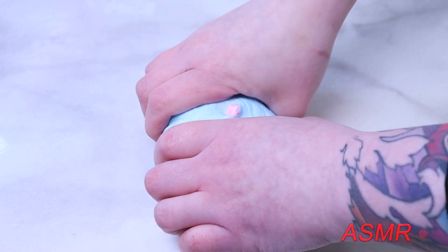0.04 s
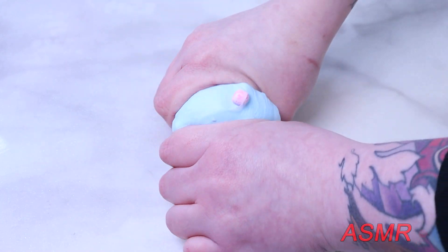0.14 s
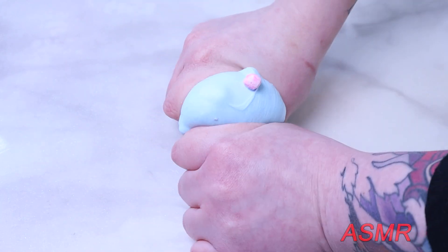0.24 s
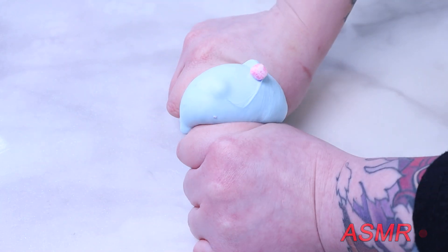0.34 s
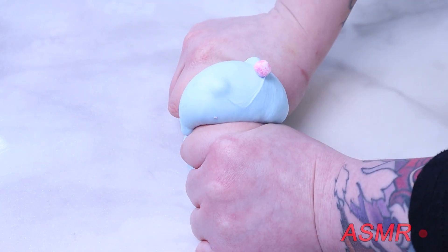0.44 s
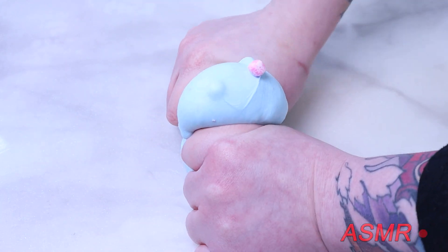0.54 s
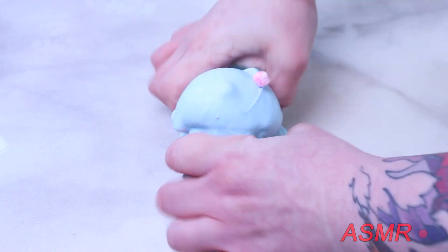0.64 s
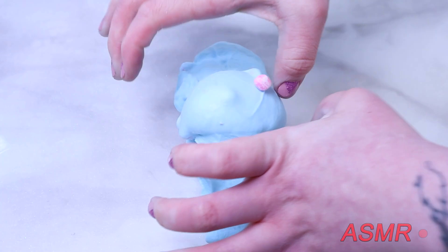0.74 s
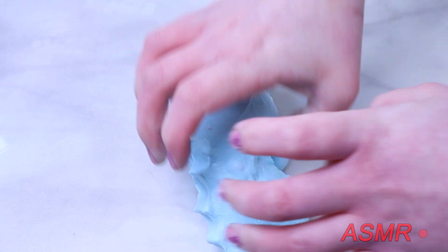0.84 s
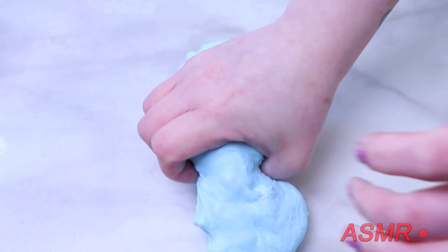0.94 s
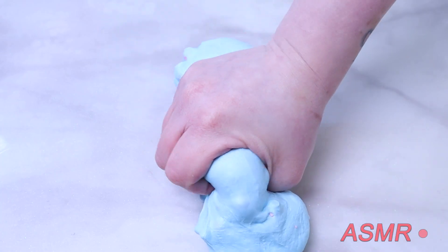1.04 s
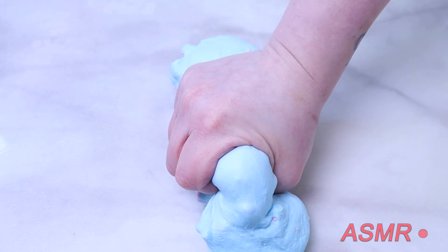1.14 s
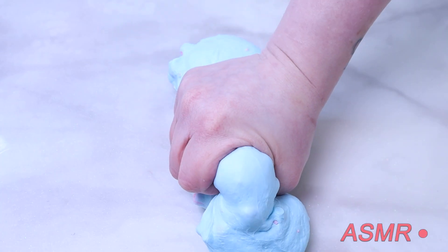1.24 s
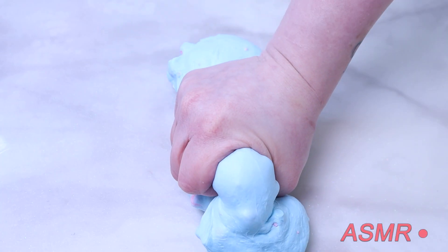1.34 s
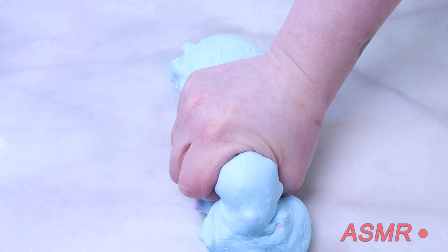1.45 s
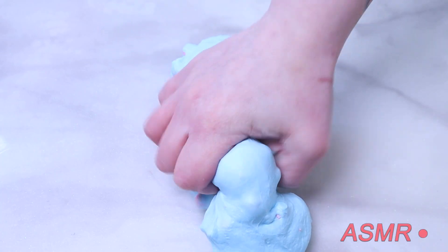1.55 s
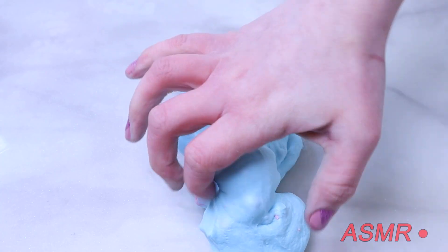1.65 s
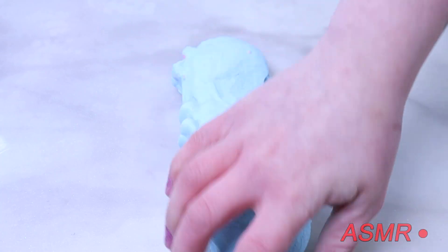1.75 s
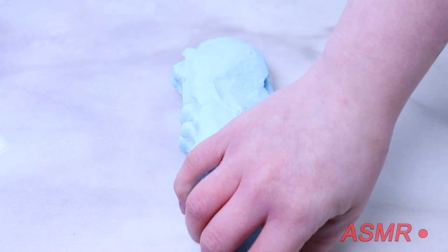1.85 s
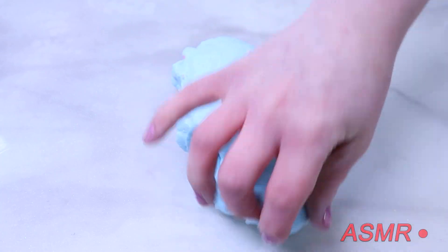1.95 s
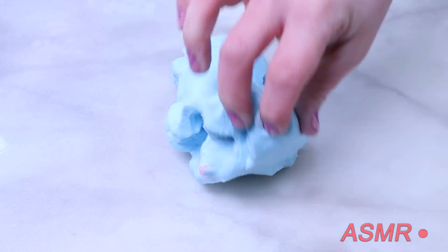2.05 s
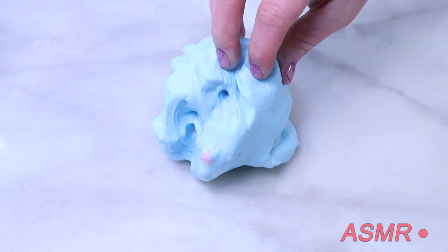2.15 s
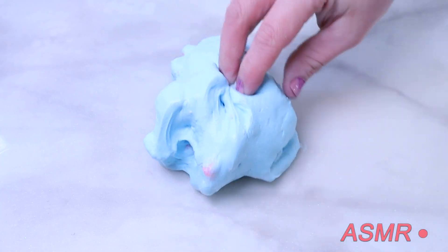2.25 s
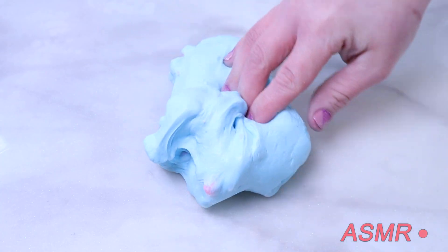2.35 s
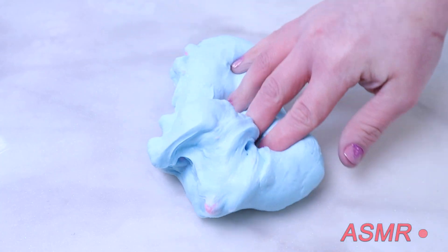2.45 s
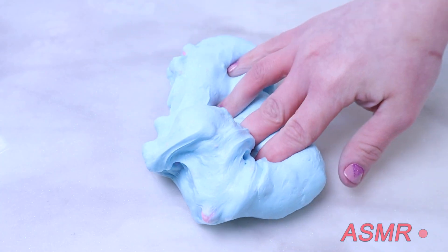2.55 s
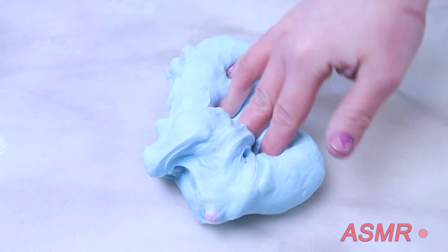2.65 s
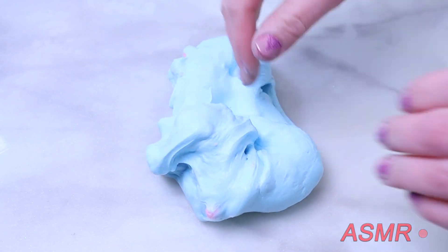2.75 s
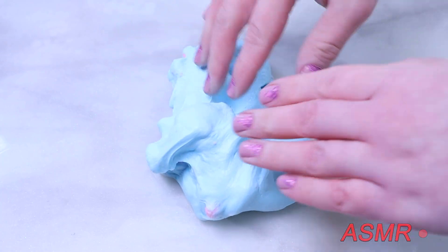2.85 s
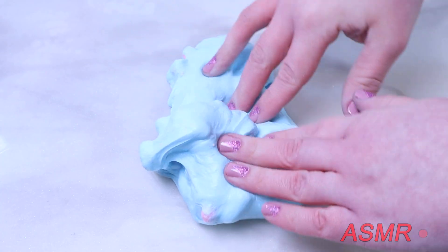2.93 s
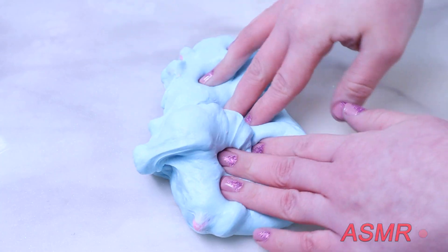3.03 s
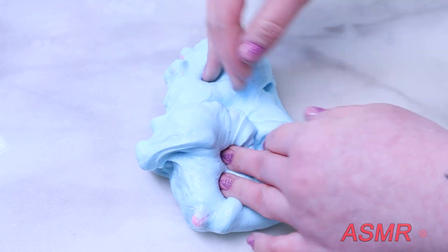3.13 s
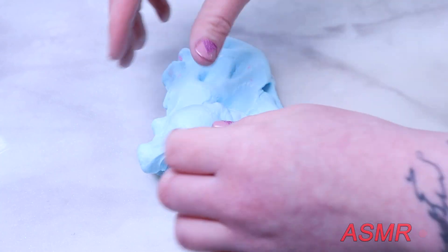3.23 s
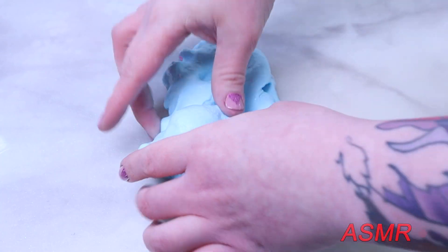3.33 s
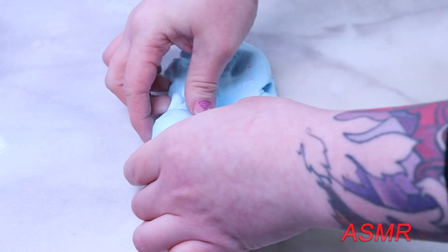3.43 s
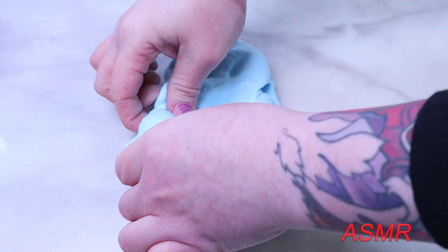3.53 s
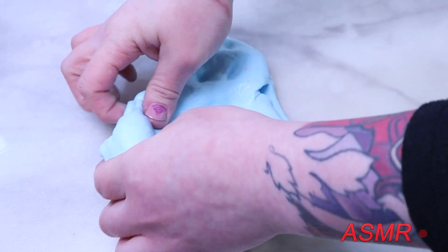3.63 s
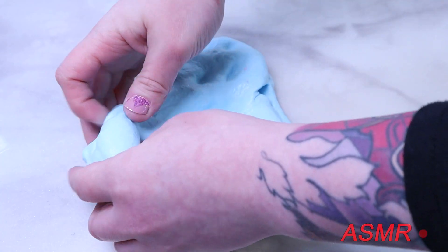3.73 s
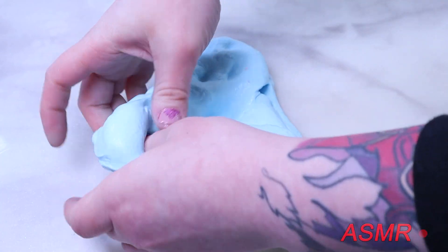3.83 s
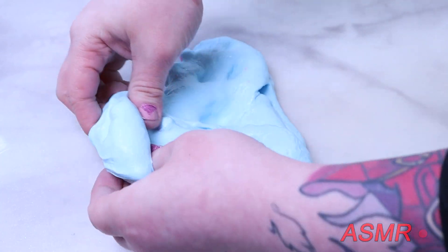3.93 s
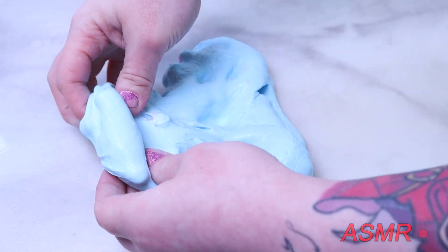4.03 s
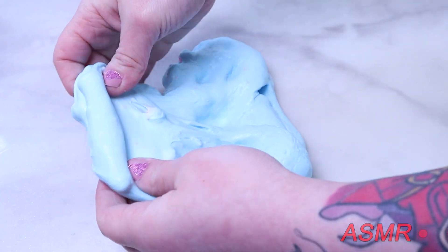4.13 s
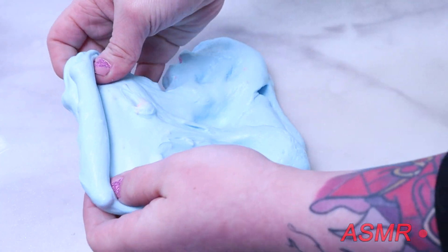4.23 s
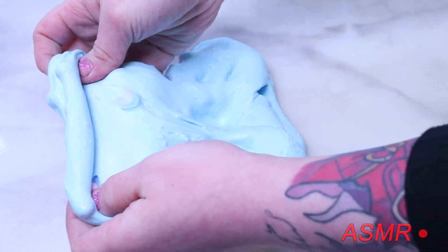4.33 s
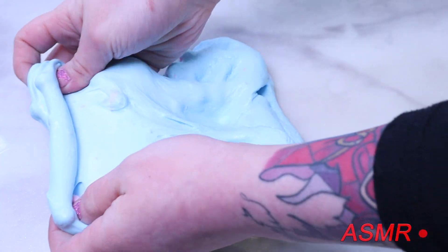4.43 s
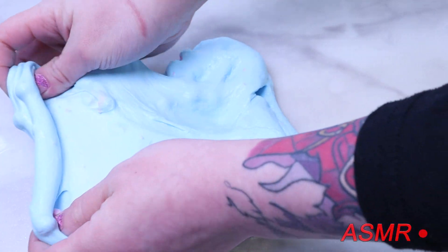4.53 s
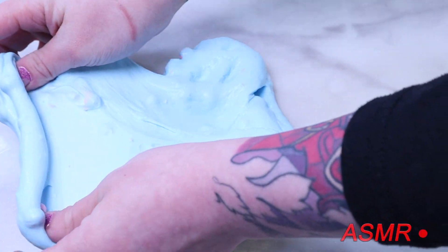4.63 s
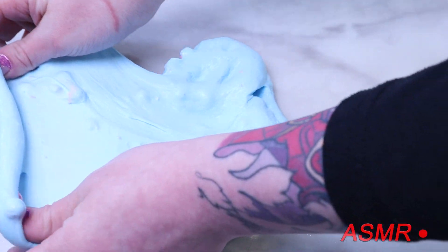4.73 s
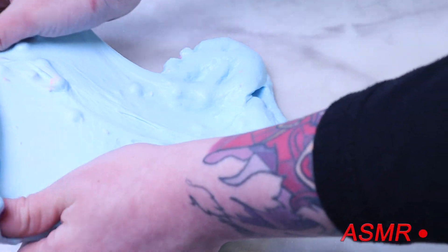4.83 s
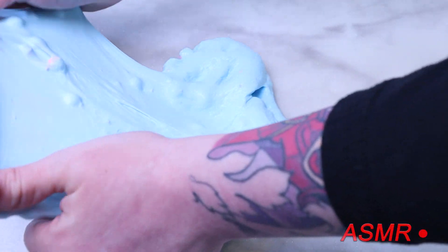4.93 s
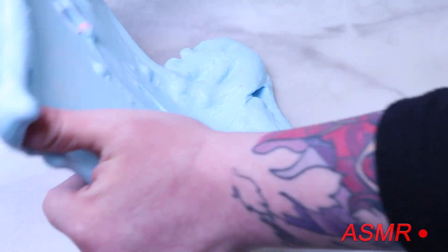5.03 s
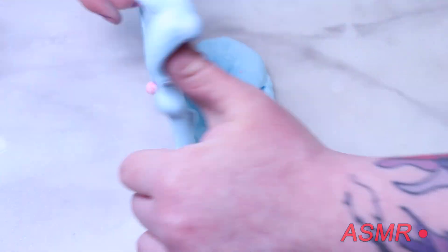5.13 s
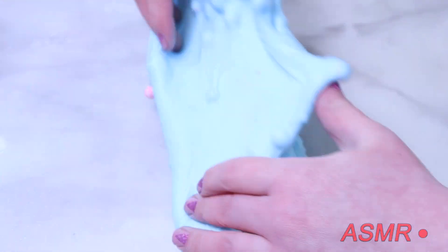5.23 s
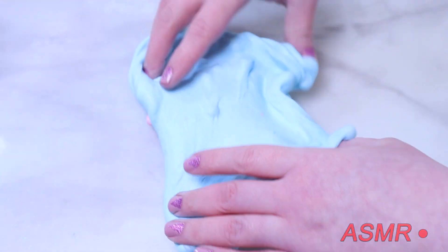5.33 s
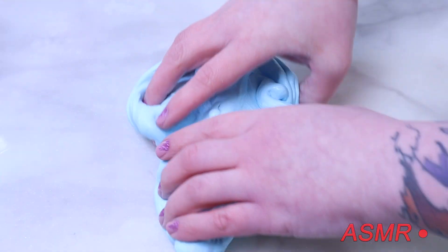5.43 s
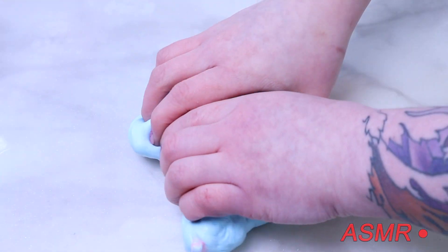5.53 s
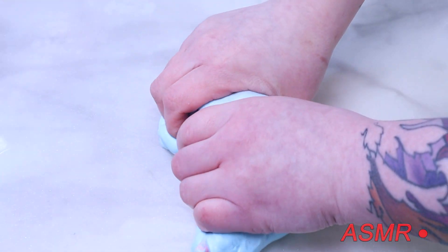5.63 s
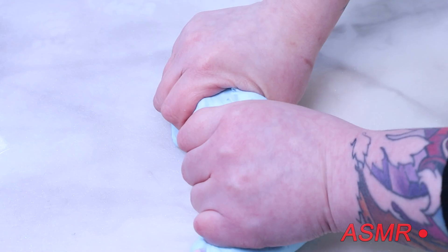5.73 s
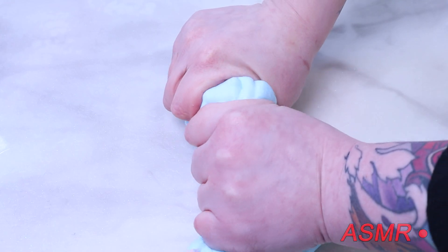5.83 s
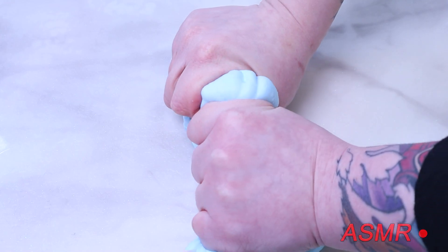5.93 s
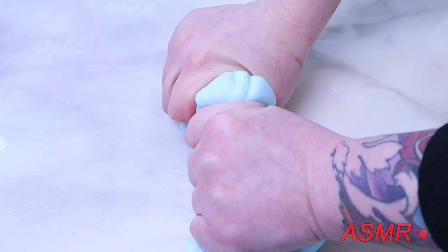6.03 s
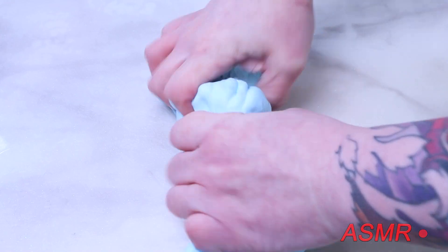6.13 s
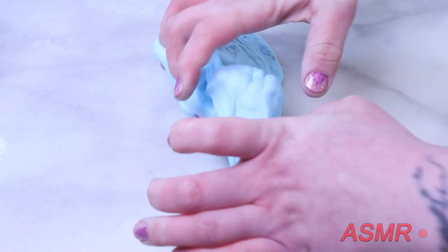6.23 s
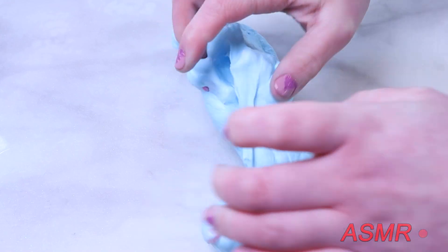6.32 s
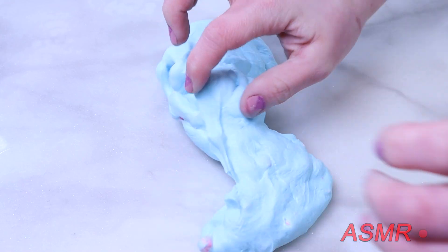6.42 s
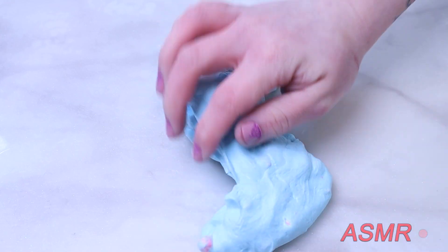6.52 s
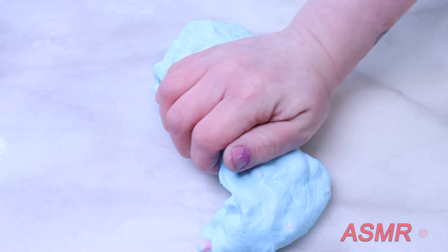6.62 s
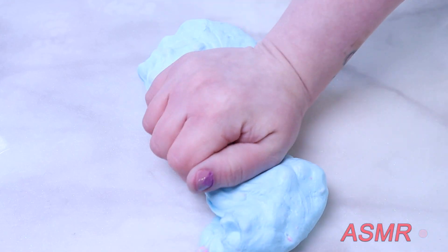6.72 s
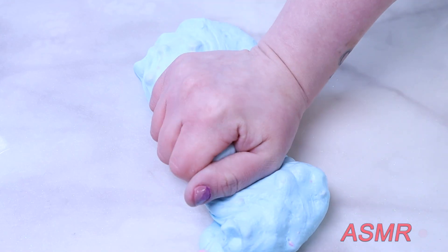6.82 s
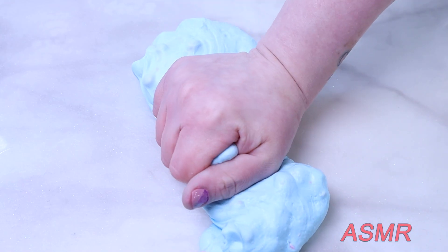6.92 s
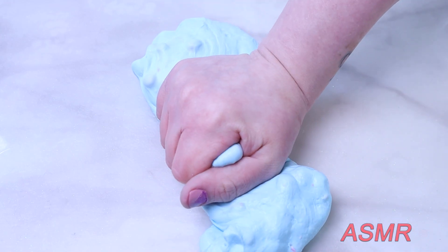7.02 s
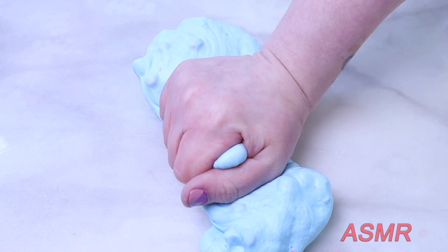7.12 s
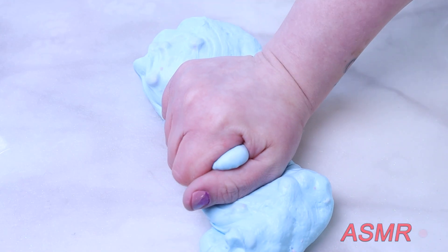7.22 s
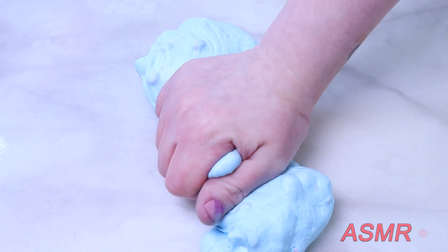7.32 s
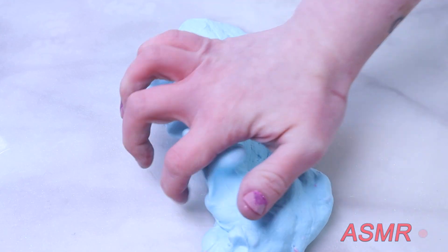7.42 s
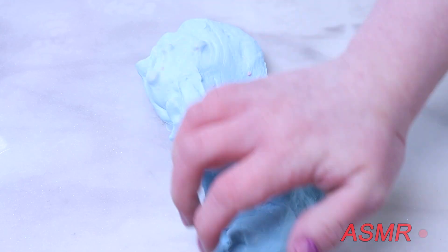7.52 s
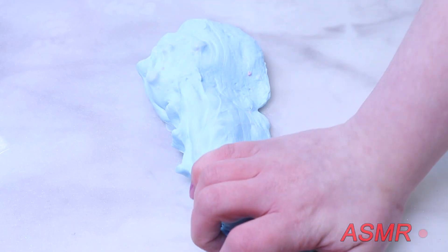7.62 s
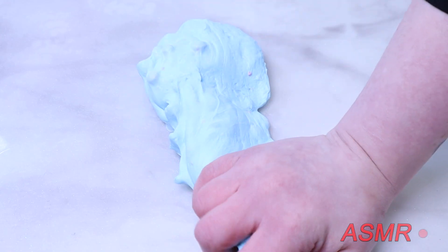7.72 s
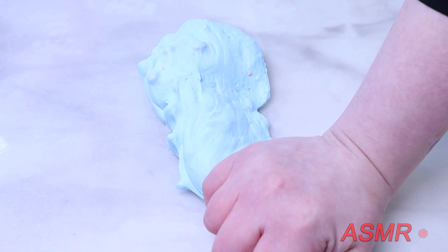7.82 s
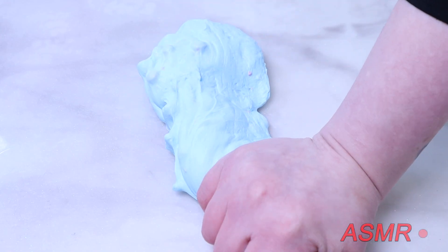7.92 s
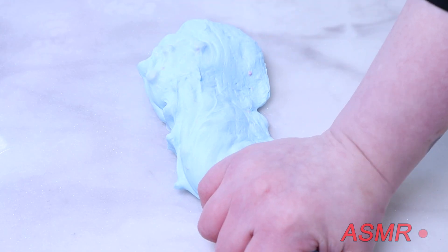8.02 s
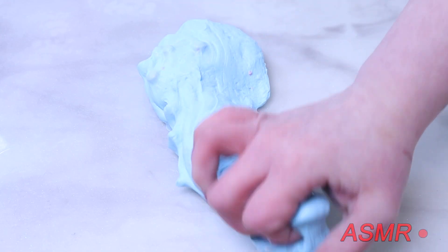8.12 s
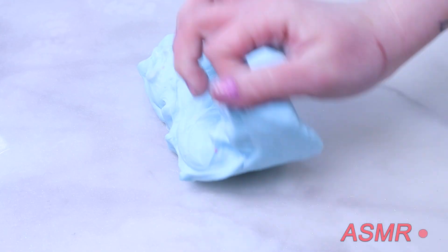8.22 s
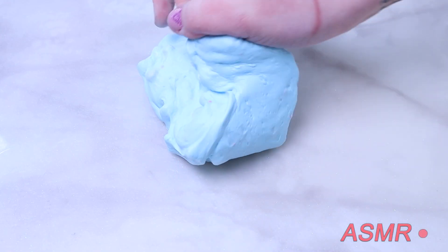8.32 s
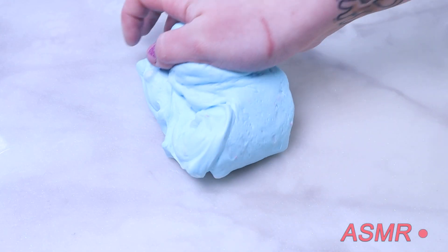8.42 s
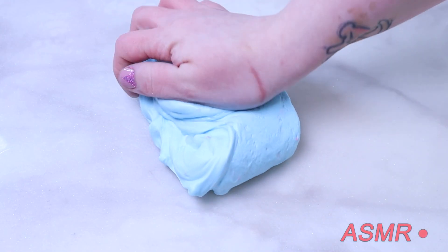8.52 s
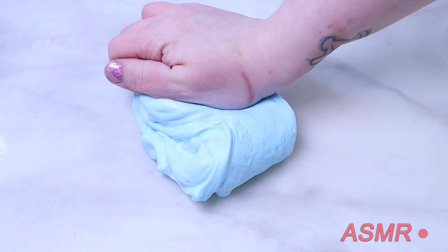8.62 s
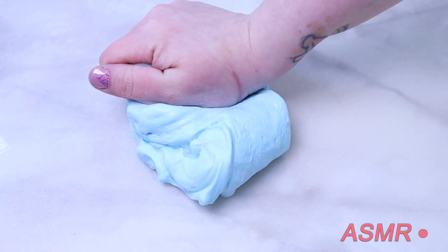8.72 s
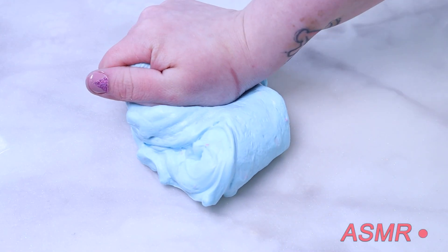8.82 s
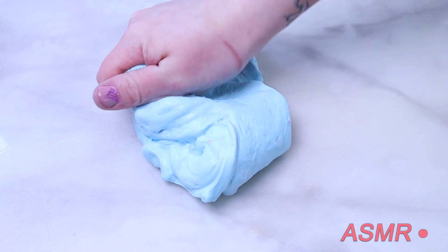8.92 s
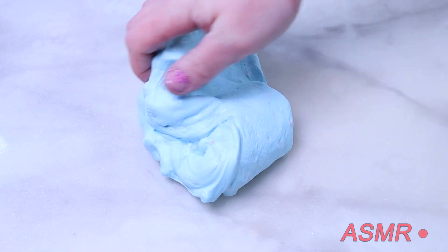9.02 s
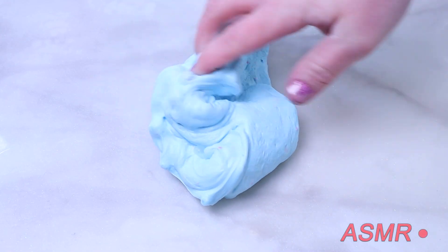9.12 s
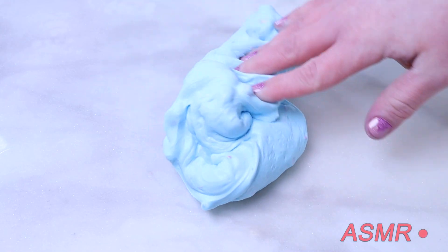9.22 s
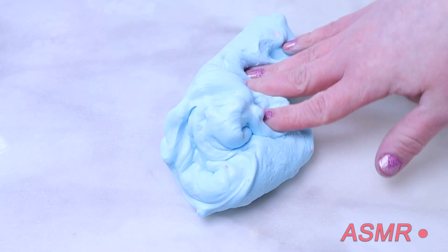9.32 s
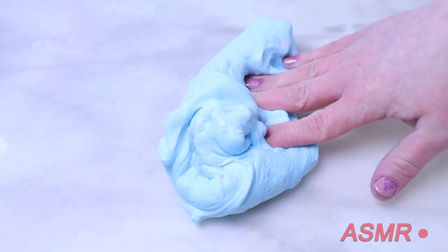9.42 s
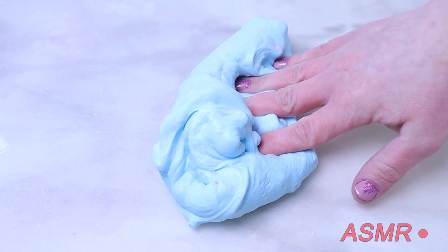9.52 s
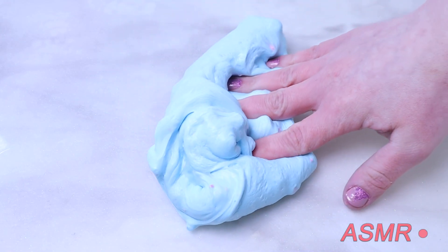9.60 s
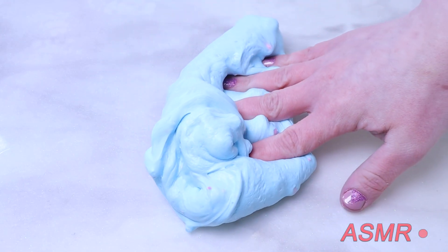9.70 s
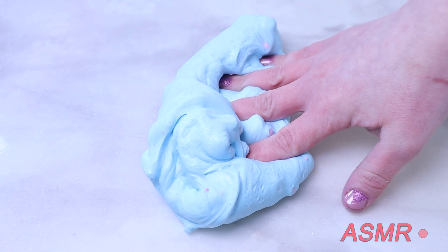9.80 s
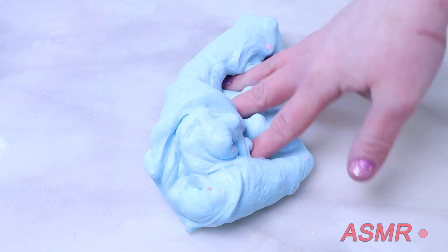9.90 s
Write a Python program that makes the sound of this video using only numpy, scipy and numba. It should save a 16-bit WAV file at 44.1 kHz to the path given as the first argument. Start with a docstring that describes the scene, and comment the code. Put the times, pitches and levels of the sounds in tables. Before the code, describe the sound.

Close, dry crackle and loud irregular bubble pops burst from kneaded foamy slime, with moist squishes, soft tabletop thuds and quieter stretching between squeezes.

```python
"""Soft foamy slime is squeezed, stretched and folded on a table top, close to a sensitive microphone.
Trapped bubbles burst as clicks: each film snaps and tears while its small cavity rings as a resonator.
Swarms of damped sines make the fine crackle, squelch and ticks of the wet skin; threads snap as thin
clicks, and air squeaks through slits in the skin. Landings and changing hand pressure drive the low
modes of the table, steady hiss lies below, and loud pops overload the input."""
import sys
import numpy as np
from scipy import signal
from scipy.fft import rfft, irfft
from scipy.io import wavfile
from scipy.ndimage import uniform_filter1d
from numba import njit

SR = 44100
rng = np.random.default_rng(int(sys.argv[2]) if len(sys.argv) > 2 else 0)


def bounce(signal):
    """Save signal as a 16-bit WAV file at the path given by the first command-line argument."""
    frames = np.transpose(np.atleast_2d(signal))
    limited = np.clip(frames, -1, 1)
    pcm = np.round(limited * 32767).astype(np.int16)
    wavfile.write(sys.argv[1], SR, pcm)


N = 439236

# Hand and slime landing on the table: start_s, level_db (peak of the upper modes),
# lowest_mode_db (relative to level_db), ring_factor (on each mode's ring time, at least 0.1 is used;
# small values give a damped thump)
LANDINGS = [(0.07, -12.5, -29, 0.3), (0.125, -18.5, -26, 0.4), (0.711, -12.5, -9, 1.14),
            (1.617, -13.5, -15.5, 1), (1.909, -11.5, -23, 0.3), (2.499, -27.5, -12, 1),
            (2.786, -10, -27, 0.9), (3.004, -13.5, -22, 1), (3.194, -9, -20, 0.26), (3.251, -14, -17, 1),
            (3.435, -23, -20, 0.6), (3.463, -12, -13, 0.65), (3.69, -22, -23, 1), (4.129, -19.5, -13, 0.16),
            (5.238, -29.5, 16, 0.02), (5.41, -22, -7, 0.2), (5.488, -17.5, -10, 0.74),
            (5.584, -14.5, -20, 0.1), (5.696, -19.5, -22, 0.1), (6.222, -10, -25, 1),
            (6.427, -16.5, -17, 1), (6.529, -24, -23, 0.4), (6.898, -23, -16, 0.5), (7.44, -17, -17, 0.93),
            (8.03, -22.5, -33, 0.9), (8.535, -23.5, -27, 1), (8.587, -18.5, -12, 0.57),
            (8.995, -29, -22, 0.7), (9.044, -26, -22, 0.6), (9.84, -40, 9.5, 0.13),
            (9.909, -44, 12.5, 0.05)]
ROOM_T60_S = 0.17


def undb(db):
    """A level in decibels is 20 times the logarithm of an amplitude ratio."""
    return 10 ** (np.asarray(db) / 20)


def unit(x):
    """Normalization by the effective value: scale to rms 1."""
    return x / np.sqrt(np.mean(x ** 2))


def fade(t, t60):
    """Linear damping gives exponential decay: 60 dB in t60 seconds."""
    return np.exp(-np.log(1000) * t / t60)


def band(x, hz, sharp):
    """Two-pole resonance with gain 1 at its centre; sharp is the quality factor."""
    centre_hz = min(hz, .42 * SR)
    b, a = signal.iirpeak(centre_hz, max(sharp, .3), fs=SR)
    return signal.lfilter(b, a, x)


def add(out, start_s, x):
    """Superposition: mix x into out from start_s."""
    i = max(int(start_s * SR), 0)
    out[i:i + len(x)] += x[:N - i]


def walk(rate):
    """Random modulation: levels held 1 / rate seconds and slewed; spread near 1."""
    hold = int(SR / rate)
    levels = np.repeat(rng.standard_normal(N // hold + 1), hold)
    return uniform_filter1d(levels, hold // 2 + 1)[:N]


def hump(t, peak_s, swell_s, fade_s):
    """Power envelope, 30 dB down at swell_s before and fade_s after its peak."""
    early = t < peak_s
    distance = np.abs((t - peak_s) / np.where(early, swell_s, fade_s))
    # 1 = pointed, 2 = rounded: the wet skin keeps peeling, then lets go
    roundness = np.where(early, 1.15, 1.393)
    return undb(-2 * 30 * distance ** roundness)  # doubled decibels, as this is power


def hiss():
    """Stationary noise of room and microphone, shaped by its spectral density."""
    # Noise spectrum before scaling to the overall level: frequency_hz, density_db (per Hz, relative)
    hiss_spectrum = [(30, 18.5), (120, 12.5), (400, -30), (1000, -24), (4000, -45), (9000, -27),
                     (16000, -47)]
    hz, db = np.transpose(hiss_spectrum)
    bins_hz = np.arange(N // 2 + 1) * SR / N
    shape = undb(np.interp(np.log(bins_hz + 1), np.log(hz), db))
    noise = irfft(rfft(rng.standard_normal(N)) * shape, N)
    return unit(noise) * undb(-53)


def pressure(t):
    """Incoherent powers add: changing hand pressure plus the lean that follows each landing, in dB."""
    # Changing hand pressure on the table, heard as an uneven low rumble: time_s, rumble_db
    hand_pressure = [(0.0, -59), (1.1, -48), (2.3, -59), (3.5, -52.5), (4.15, -40.5), (4.9, -54.5),
                     (5.57, -32.5), (6.1, -38), (6.64, -45), (7.1, -47), (7.87, -40), (8.23, -42),
                     (8.41, -53), (8.93, -45), (9.05, -36), (9.39, -53.5), (9.96, -46)]
    lean_db, late_s, swell_s, fade_s = -16.5, 0.054, 0.11, 0.21  # level relative to the landing
    power = undb(2 * np.interp(t, *np.transpose(hand_pressure)))
    for start_s, level_db, *_ in LANDINGS:
        power = power + undb(2 * (level_db + lean_db)) * hump(t, start_s + late_s, swell_s, fade_s)
    return 10 * np.log10(power)


def table(rumble_db):
    """Modal excitation: soft pushes and changing hand pressure drive the low modes of the table top."""
    # Modes of the table top, lowest first: frequency_hz, level_db (relative), t60_s (at ring factor 1)
    table_modes = [(54.42, -2, 0.95), (105.6, 4, 0.24), (140.7, 8, 0.19), (217.4, -1.5, 0.28),
                   (287, -5, 0.11), (430, -6, 0.047)]
    push_s, push_unevenness = 0.0067, 1
    blows, t = np.zeros(N), np.arange(SR // 3) / SR

    def modes(ring_factor):
        """Modal decay: each mode's ring time is multiplied by a factor of at least 0.1."""
        # neighbouring modes start in opposite directions
        return [(-1) ** k * undb(db) * np.sin(2 * np.pi * hz * t) * fade(t, t60 * max(ring_factor, .1))
                for k, (hz, db, t60) in enumerate(table_modes)]

    for start_s, level_db, lowest_db, ring_factor in LANDINGS:
        lowest, *upper = modes(ring_factor)
        # a soft lump lands a little unevenly
        uneven = unit(uniform_filter1d(rng.standard_normal(2048), size=40))[:int(push_s * SR)]
        push = np.hanning(len(uneven)) * (1 + push_unevenness * uneven)
        blow = signal.fftconvolve(sum(upper), push)
        boom = signal.fftconvolve(lowest, push)
        landing = blow / np.abs(blow).max() + undb(lowest_db) * boom / np.abs(boom).max()
        add(blows, start_s, undb(level_db) * landing)

    lowest, *upper = modes(0.65)
    unsteady_force = rng.standard_normal(N) * undb(4.0 * walk(9))
    response = undb(-1.5) * lowest + sum(upper)
    rumble = signal.fftconvolve(unsteady_force, response)[:N]
    return blows + unit(rumble) * undb(rumble_db)


def squeaks():
    """Relaxation oscillation: air forced through a slit in the skin makes it flap unevenly."""
    # Squeaks, slowing as the pocket empties: start_s, length_s, start_hz, end_hz, level_db
    squeak_list = [(5.817, 0.044, 1000, 760, -10.5), (5.879, 0.012, 3880, 3620, -11.5),
                   (5.888, 0.011, 5700, 5000, -10.5)]
    wobble_at_1khz = .13  # relative pitch spread, inversely proportional to the start pitch
    out = np.zeros(N)
    for start_s, length_s, start_hz, end_hz, level_db in squeak_list:
        part = np.arange(int(length_s * SR)) / (length_s * SR)
        flutter = unit(uniform_filter1d(rng.standard_normal(4096), size=90))[:len(part)]
        glide_hz = start_hz + (end_hz - start_hz) * part
        hz = glide_hz * (1 + wobble_at_1khz * 1000 / start_hz * flutter)
        turn = 2 * np.pi * np.cumsum(hz) / SR
        # the slit snaps shut hard enough to add the octave
        tone = np.sin(turn) + 0.7 * np.sin(2 * turn)
        envelope = np.sqrt(np.sin(np.pi * part ** 0.23))  # quick rise, slow fall
        add(out, start_s, undb(level_db) * envelope * tone)
    return out


def snaps():
    """Impulse response: a snapping thread gives a thin click of chance colour and a faint short rustle."""
    # Thin threads snapping: start_s, peak_db
    thread_snaps = [(0.1454, -4), (0.1785, -9), (0.1964, -9), (0.3044, -1), (0.3651, 7), (0.4738, 0),
                    (0.5514, -7), (0.8084, -12), (0.9492, -28), (0.966, -27), (1.0211, -21), (1.0535, -23),
                    (1.0833, -20), (1.1354, -5), (1.1638, -6), (1.2142, -14), (1.2214, -19), (1.2348, -1),
                    (1.3454, -13), (1.3623, -8), (1.3714, -11), (1.3786, -6), (1.3954, -11),
                    (1.4252, -14.5), (1.4621, -27), (1.483, -29), (1.921, -17), (2.0154, -11), (2.025, -9),
                    (2.038, -2), (2.0984, -20), (2.135, -17), (2.146, -25), (2.3785, -22), (2.4684, -23),
                    (2.5987, -21), (2.616, -15.5), (2.6294, -27), (2.9756, -37), (3.0094, -15.5),
                    (3.036, -18), (3.059, -22), (3.0809, -29), (3.108, -15.5), (3.1425, -18.5),
                    (3.5625, -15), (3.9799, -13), (4.0387, -4.5), (4.1579, -4), (4.411, -8.5),
                    (4.4512, -12), (4.5164, -24), (4.5326, -15), (4.5895, -16), (4.6944, -21),
                    (4.7257, -25), (4.9355, -17), (5.5464, -12), (5.6577, -8), (5.7034, 3), (5.7203, 4),
                    (5.745, 1), (6.2881, -6), (6.796, -22), (6.8194, -15), (6.8573, -9), (6.8884, -21),
                    (6.9034, -19), (6.9274, -9), (6.9326, -8), (6.9424, -4), (6.9474, -3), (6.9506, 1),
                    (6.9584, -1), (7.0054, -4), (7.0414, -1), (7.0564, -6), (7.0675, 1), (7.0847, -11),
                    (7.091, -1), (7.212, -4), (7.2314, -13), (7.249, -10), (7.255, -10), (7.275, -9),
                    (7.2804, -17), (7.2874, -12), (7.303, -12), (7.3093, -4), (7.7834, -18), (7.79, -5),
                    (7.8014, -6), (7.817, -5), (7.8954, -9), (7.9054, -9), (7.9149, -1), (7.928, -1),
                    (8.301, -11), (8.3429, -14), (8.3599, -12), (8.5415, -15.5), (8.6009, -22),
                    (8.7498, -5.5), (8.8387, -11), (8.853, 1), (8.8664, -9), (8.9344, -12.5), (9.426, -7),
                    (9.698, -18), (9.9322, -19)]
    # Range of the click resonance: lowest_hz, highest_hz
    snap_range = (5000, 12200)
    rustle_db, rustle_t60_s = -22, .028
    out, t = np.zeros(N), np.arange(2048) / SR
    for start_s, peak_db in thread_snaps:
        hz = rng.uniform(*snap_range)
        click = undb(rustle_db) * rng.standard_normal(len(t)) * fade(t, rustle_t60_s)
        click[0] -= 1
        click = band(click, hz, 1.3)
        add(out, start_s, undb(peak_db) * click / np.abs(click).max())
    return out


@njit
def ring(start, hz, half_turns, size, n, sr):
    """Damped free oscillation: each grain is a sine that falls by 1 / e in the given half turns."""
    out = np.zeros(n)
    for g in range(len(start)):
        step = np.exp((2j * np.pi - 2 / half_turns) * hz[g] / sr)
        z, i = 1 + 0j, start[g]
        while i < n and abs(z) > .003:
            out[i] += size[g] * z.imag
            z, i = z * step, i + 1
    return out


def grains(family, bunch_db, bunch_rate):
    """Random superposition: small bubbles of all sizes, a few much louder, swelling in bunches."""
    rate, lo_hz, hi_hz, half_turns, spread_db, most_db = family
    when, pitch, loudness, sign = rng.random((4, int(rate * N / SR)))
    size_db = np.minimum(-spread_db * np.log(1 - loudness), most_db)
    size = np.sign(sign - .5) * undb(size_db)
    start = (when * N).astype(np.int64)
    hz = lo_hz * (hi_hz / lo_hz) ** pitch
    swarm = ring(start, hz, 1. * half_turns, size, N, 1. * SR)
    return unit(swarm * undb(bunch_db * walk(bunch_rate)))


def peeling():
    """Stick and release: patches let go at chance moments, each a sudden rise and a quick fade."""
    peels_per_s, peel_t60_s, rest = 70, .035, .12
    starts = (rng.random(N) < peels_per_s / SR) * rng.random(N)
    return rest + signal.lfilter([1], [1, -fade(1 / SR, peel_t60_s)], starts)


def effort(t):
    """Power addition: squishes join the stretching; fizz power weights the fineness of the fizz."""
    # Slow stretching between the squishes: time_s, fizz_db, squelch_db, fine_minus_coarse_db
    stretching = [(0.0, -90, -72, 0), (.91, -58, -62, -4), (1.0, -47, -47, -9), (1.44, -43, -54, -2),
                  (1.51, -71, -67, -2), (1.848, -59, -63, -8), (2.55, -54.5, -46.5, 19),
                  (3.02, -47.5, -44.5, 0), (3.37, -62, -50.5, -1), (3.47, -41.5, -47, -13),
                  (3.8, -44, -54, 7), (3.91, -63, -57, 3), (4.054, -41.5, -37, 0), (4.307, -43, -49.5, 14),
                  (4.518, -38.5, -50, 7), (4.8, -40.5, -49.5, -5), (5.084, -46.5, -53, -3),
                  (6.62, -70, -58, 0), (7.39, -41, -57, -1), (7.6, -77, -58, -1), (7.731, -43, -41, 3),
                  (7.922, -28.5, -48, 12), (8.1, -64, -74, 0), (8.57, -51.5, -45.5, 15),
                  (8.754, -41, -44.5, -8), (8.892, -40, -75, 12), (9.0, -65, -57, 15), (9.562, -50, -49, 9),
                  (9.96, -60, -59, -4)]
    # Separate squishes of the lump: peak_s, fizz_db, squelch_db, fine_minus_coarse_db, swell_s, fade_s
    squish_list = [(0.116, -38, -36, -10, 0.18, 0.63), (0.264, -41, -23.5, -6, 0.039, 0.09),
                   (0.451, -21.5, -55, 18, 0.39, 0.15), (0.704, -23, -28.5, -5, 0.033, 0.24),
                   (0.758, -21, -17, -6, 0.081, 0.069), (1.124, -39, -37, 3, 0.22, 0.16),
                   (1.256, -22.5, -50, 17, 0.028, 0.099), (1.627, -23, -21.5, -13, 0.049, 0.21),
                   (1.762, -33.5, -35, 11, 0.34, 0.0084), (2.038, -30, -43, 16.5, 0.13, 0.29),
                   (2.369, -41.5, -39.5, 8, 0.04, 0.04), (2.788, -20, -19, 17, 0.063, 0.065),
                   (3.203, -25.5, -28, 6, 0.04, 0.04), (3.257, -23.5, -17.5, 33, 0.057, 0.058),
                   (3.708, -37, -36.5, -8, 0.13, .25), (3.844, -29, -25, 4, 0.036, 0.03),
                   (3.965, -35, -29, 12, 0.06, 0.067), (5.185, -32.5, -41, 25, 0.22, 0.03),
                   (5.341, -35.5, -38, 1, 0.15, 0.062), (5.529, -26.5, -32.5, -3, 0.19, 0.15),
                   (5.68, -24.5, -24.5, 1, 0.17, 0.14), (5.83, -20, -9, -13, 0.046, 0.14),
                   (6.015, -15.5, -32, 8.5, 0.22, 0.18), (6.246, -15.5, -14.5, -8, 0.13, 0.1),
                   (6.441, -36, -36.5, -6.5, 0.36, 0.15), (6.581, -39, -38.5, 15, 0.052, 0.032),
                   (6.701, -42, -36.5, 11, 0.12, 0.15), (6.806, -33.5, -38.5, -2, 0.09, 0.2),
                   (6.987, -19, -31.5, 35, 0.074, 0.11), (7.165, -35, -51, 11, 0.069, 0.31),
                   (7.442, -23, -24, -3, 0.054, 0.15), (7.525, -28.5, -26, 23, 0.1, 0.019),
                   (7.977, -21.5, -29.5, 7, 0.057, 0.13), (8.2, -25, -30.5, 2.5, 0.12, 0.19),
                   (8.495, -35.5, -47, -4, 0.11, 0.022), (9.047, -32, -35.5, 8.5, 0.24, 0.46),
                   (9.447, -47.5, -55, 11, 0.07, 0.26), (9.955, -36.5, -60, 6, 0.051, .1)]
    times_s, *columns = np.transpose(stretching)
    fizz_db, squelch_db, fine_db = (np.interp(t, times_s, c) for c in columns)
    fizz_power, squelch_power = undb(2 * fizz_db), undb(2 * squelch_db)
    weighted_fine = fizz_power * fine_db
    for peak_s, fizz_db, squelch_db, fine_db, swell_s, fade_s in squish_list:
        shape = hump(t, peak_s, swell_s, fade_s)
        squish_fizz = undb(2 * fizz_db) * shape
        fizz_power = fizz_power + squish_fizz
        squelch_power = squelch_power + undb(2 * squelch_db) * shape
        weighted_fine = weighted_fine + squish_fizz * fine_db
    return 10 * np.log10(fizz_power), 10 * np.log10(squelch_power), weighted_fine / fizz_power


def kneading(fizz_db, squelch_db, fine_db):
    """Dense superposition: threads and tiny bubbles merge into a ragged fizz, with squelch and ticks."""
    # Grain families: rate_per_s, lowest_hz, highest_hz, decay_half_turns (to 1 / e),
    # spread_db (mean size over the smallest before the cap), largest_db (cap over the smallest)
    fizz_family = (11000, 1640, 19000, 1.17, 3.3, 22)
    tick_family = (1600, 900, 14000, 2.2, 3.6, 14)
    squelch_family = (3600, 340, 2800, 1.3, 3.5, 14)
    swarm = grains(fizz_family, 3.8, 100)
    # finer bubbles ring higher, so the split at 6 kHz parts coarse from fine
    coarse = unit(signal.lfilter(*signal.butter(2, 6000, "low", fs=SR), swarm))
    fine = unit(signal.lfilter(*signal.butter(2, 6000, "high", fs=SR), swarm))
    # opposite sign, so that the halves add where they overlap
    fizz = (coarse - undb(fine_db) * fine) / np.sqrt(1 + undb(2 * fine_db))
    squelch = grains(squelch_family, 3.0, 70)
    ticks = unit(peeling() * grains(tick_family, 2, 25))
    # ticks swell less than the fizz (dB per dB), so they stand out in gentle stretching
    tick_db = .9 * fizz_db - 5
    return undb(fizz_db) * fizz + undb(squelch_db) * squelch + undb(tick_db) * ticks


def space(x):
    """Reverberation: the small room smears the fine grains with a weak decaying tail."""
    t = np.arange(SR // 4) / SR
    far = rng.standard_normal(len(t)) * fade(t, ROOM_T60_S / 2) * (t > .001)
    return x + undb(-9) * signal.fftconvolve(x, far / np.linalg.norm(far))[:N]


def pops():
    """Resonator excitation: the film snaps and tears near its own pitch; the opened cavity rings low."""
    # Large bubbles: start_s, peak_db, film_pitch_hz, cavity_minus_film_db, cavity_pitch_hz,
    # tearing_minus_snap_db (tearing against the quick noise burst of the snap)
    bubbles = [(0.101, 0.5, 7300, -9, 850, -13), (0.112, 0.5, 2840, -11, 554, -15),
               (0.135, 1, 8000, -12, 380, -12), (0.156, 4, 3700, -26, 1490, -30),
               (0.202, -7, 3580, -14, 1090, -32), (0.227, 4, 2500, -7, 1270, -21),
               (0.238, 7, 2030, -17.5, 1250, -21.5), (0.246, 2.5, 5700, -33, 1010, 5),
               (0.26, 2, 2210, -20, 1520, -23), (0.267, 8, 3030, -28, 1290, 13),
               (0.293, 3.5, 5700, -31, 1220, -1), (0.314, -0.5, 13500, -27, 1200, -2),
               (0.34, 8, 8700, -18, 392, -9), (0.384, -5, 3760, -12, 794, 19),
               (0.401, 7.5, 12700, -26, 1200, -8), (0.421, -2, 7960, -38, 1490, 7),
               (0.489, 0.5, 10740, -12, 1500, -4), (0.54, -3.5, 4700, -2, 1590, -35),
               (0.699, -4, 3000, -9, 1290, 16), (1.067, -15.5, 1910, 4, 1200, -18),
               (1.113, -1.5, 1980, -26, 1670, 1), (1.148, 7.5, 2920, -12, 1220, -35),
               (1.185, -10, 3100, 2, 1195, -19), (1.244, 8, 13400, -39, 1660, 1),
               (1.268, 1, 8000, -24, 1200, -8), (1.293, 11.5, 7700, -16, 870, -12.5),
               (1.44, -14, 1800, 14, 1480, -25), (1.615, -2.5, 2720, -2, 543, -5),
               (1.958, -18, 1800, 10, 849, -25), (2.461, -15, 1900, 0, 1200, -20),
               (2.498, 4.5, 4700, -8.5, 880, -21), (2.655, -23.5, 1950, 27, 600, -10),
               (2.786, 0, 7100, 5, 487, -15), (3.595, -8, 2200, -9, 390, -28),
               (3.671, -4, 2970, -30, 1700, -36), (3.691, -0.5, 2800, 6, 1690, -28),
               (3.768, -11, 2090, 36, 536, -9), (3.831, -10, 6100, -8, 584, -17),
               (4.054, -11, 2000, 17, 880, -1), (4.168, -6, 7900, -8, 870, -17),
               (4.373, -8.5, 1900, 15, 890, -20), (4.388, -9.5, 3020, -1, 930, -28),
               (4.469, 0, 6100, -27, 950, -15), (4.504, -0.5, 4070, 1.5, 890, -16),
               (4.554, -11.5, 2060, 4, 900, -14), (4.637, -12.5, 2220, -4, 890, -16),
               (4.916, -8.5, 2600, 1, 1480, -15), (5.227, -16, 1770, -24, 1660, 3),
               (5.235, -10.5, 3870, -5, 1200, -5), (5.383, -7.5, 1900, -25, 1690, -16.5),
               (5.481, 8.5, 8400, -40, 860, -22), (5.511, -1.5, 3280, 3, 405, -8.5),
               (5.615, -0.5, 4770, -16, 1340, -0.5), (5.735, 12, 1810, 3, 1530, -21.5),
               (5.77, 10.5, 3040, -19, 1250, -8.5), (5.806, 0, 4800, -7, 865, -4),
               (5.818, 11, 1900, 20, 900, -1), (5.869, -2, 5800, -20, 900, 12),
               (5.952, 8.5, 7450, -19, 1320, -1), (5.987, -0.5, 11600, -33, 1650, -2),
               (6.012, 15, 1570, -8.5, 900, 3), (6.374, -11, 2020, 2, 500, -10),
               (6.429, -2.5, 2940, 11, 626, -7), (6.686, -0.5, 1800, 29, 1140, -20),
               (6.883, 5, 2750, -7, 1690, -46), (6.901, -12, 1800, 23, 520, -20),
               (6.974, 7.5, 7500, -9, 435, 7), (7.02, 2.5, 11400, -12, 1610, -8),
               (7.052, 3, 4350, -8, 1670, -21), (7.108, 7.5, 8800, -34, 1680, -30),
               (7.147, 13, 9000, -29, 1310, -8.5), (7.167, 3, 8100, -38, 965, -5),
               (7.18, 1.5, 3700, -37, 390, -18), (7.319, 15, 7460, -29, 1270, -25),
               (7.668, -25, 1810, 12, 1240, -9), (7.721, 4.5, 4160, -14, 1590, -13.5),
               (7.807, 3, 4200, -52, 390, -47), (7.836, 4.5, 3700, -44, 1690, -26),
               (7.944, -0.5, 7200, -37, 1370, 7), (7.959, 6, 7000, -43, 390, -10),
               (7.981, 11, 6000, -9.5, 447, -4), (8.016, 7, 5850, -19, 580, -14),
               (8.649, -5.5, 12800, -25, 440, -10), (8.708, -8.5, 3230, -7, 880, -7),
               (8.74, -14, 13000, -27, 1690, -1), (8.762, -6, 14100, -24, 660, -11),
               (8.799, -14, 7300, -9, 1290, -7), (8.818, -15.5, 1800, -27, 1630, -5),
               (8.878, -1, 13000, -47, 1670, -2.5), (9.24, -20.5, 2000, 14, 430, -2),
               (9.451, -4.5, 3350, -11, 1340, -12), (9.549, -3.5, 3070, -7.5, 1350, -9),
               (9.594, -12, 1890, 10, 1240, -21), (9.655, -17, 1790, 8, 490, 4),
               (9.718, -20.5, 2130, 14, 546, 3), (9.774, -27.5, 1900, 7, 1240, -4),
               (9.828, -21, 1910, -4, 390, -11)]
    room_db, room_top_hz = -15, 8500
    out, t = np.zeros(N), np.arange(8192) / SR
    for start_s, peak_db, film_hz, cavity_db, cavity_hz, tear_db in bubbles:
        tear_noise, room_noise = rng.standard_normal((2, len(t)))
        # tearing holds for 4 ms, then lets go
        tearing = undb(tear_db) * fade(np.maximum(t - .004, 0), 0.024)
        tear = tear_noise * (fade(t, 0.0058) + tearing)
        tear[0] -= 4  # the snap starts with a pull

        # every pop sits elsewhere, so the room answers each with another dull tail
        dull = signal.lfilter(*signal.butter(1, room_top_hz, fs=SR), room_noise)
        tail = dull * fade(t, ROOM_T60_S) * np.minimum(t / 0.00031, 1)
        air = tear + undb(room_db) * np.linalg.norm(tear) * tail / np.linalg.norm(tail)

        film = band(air, film_hz, 3.06)
        film = film + 0.2 * np.diff(air, prepend=0)  # bright edge
        film = film + 0.75 * band(air, 3100, 0.91)  # broad body
        cavity = band(air, cavity_hz, 3.1)
        pop = film / np.linalg.norm(film) + undb(cavity_db) * cavity / np.linalg.norm(cavity)
        add(out, start_s, undb(peak_db) * pop / np.abs(pop).max())
    return out


def scene():
    """Linear superposition of all sources at the microphone."""
    t = np.arange(N) / SR
    control_s = np.arange(0, N / SR, 1 / 1000)  # slow levels are computed each millisecond
    rumble_db = np.interp(t, control_s, pressure(control_s))
    slime = kneading(*(np.interp(t, control_s, c) for c in effort(control_s)))
    mix = hiss() + table(rumble_db) + squeaks() + snaps() + space(slime) + pops()
    return mix[None]


def record(dry):
    """Saturation between filters: a presence peak, an input that flattens loud pops, and a cut top."""
    bright = dry + undb(-5.5) * band(dry, 7500, 6.8)
    ceiling = .74
    clipped = bright / (1 + (bright / ceiling) ** 4) ** .25
    # the coupling droops the flat tops
    coupled = signal.lfilter(*signal.butter(3, 38, "high", fs=SR), clipped)
    top_cut = signal.ellip(10, .2, 70, 16000, fs=SR, output="sos")
    return signal.sosfilt(top_cut, coupled)


dry = scene()
out = record(dry)
bounce(out)
```